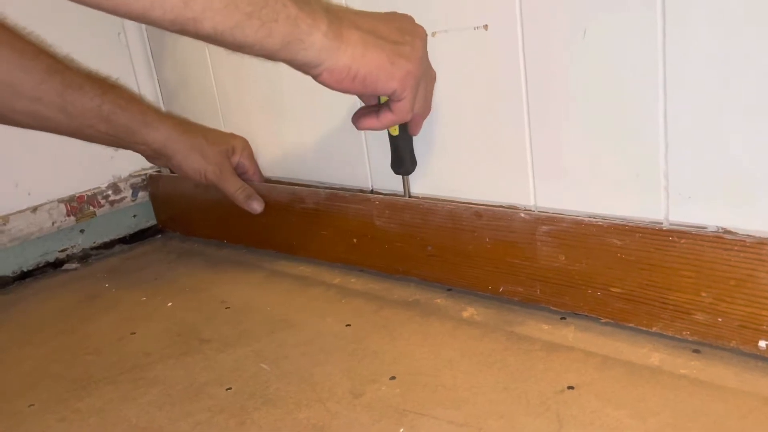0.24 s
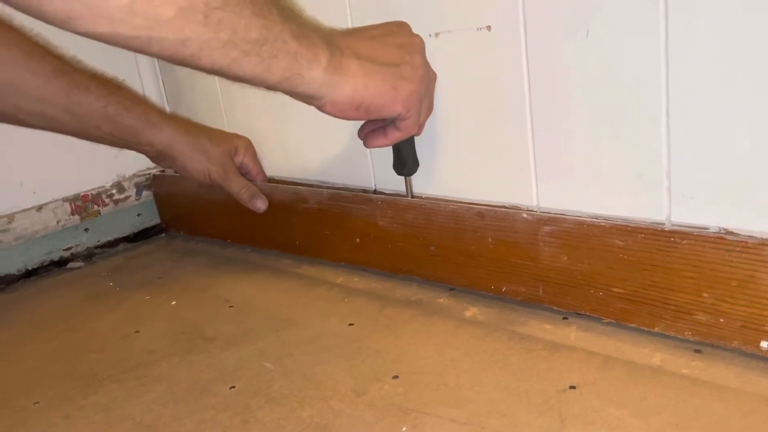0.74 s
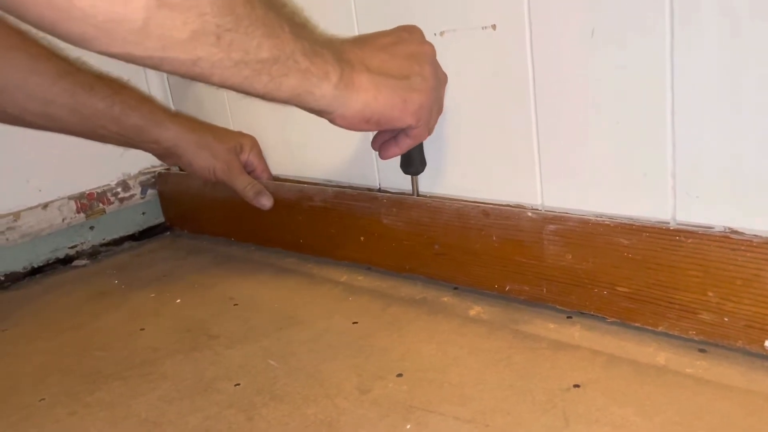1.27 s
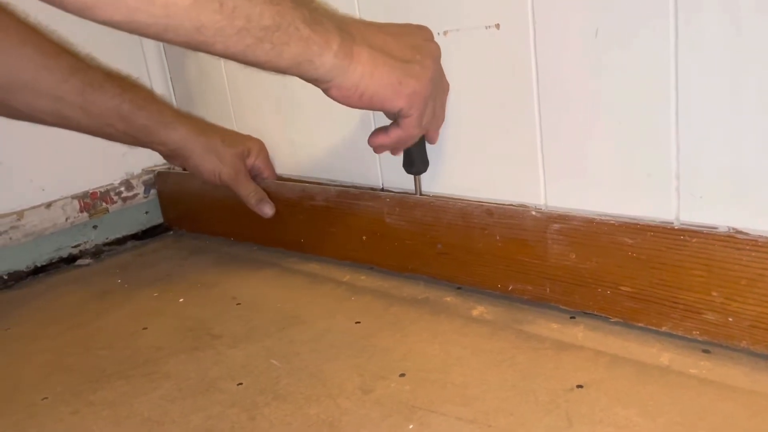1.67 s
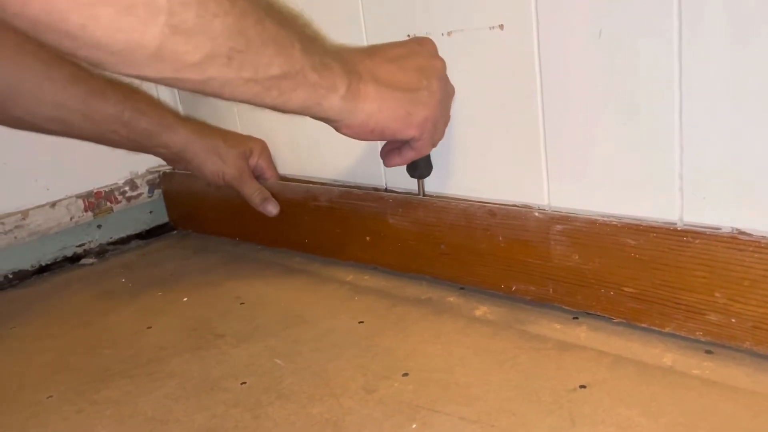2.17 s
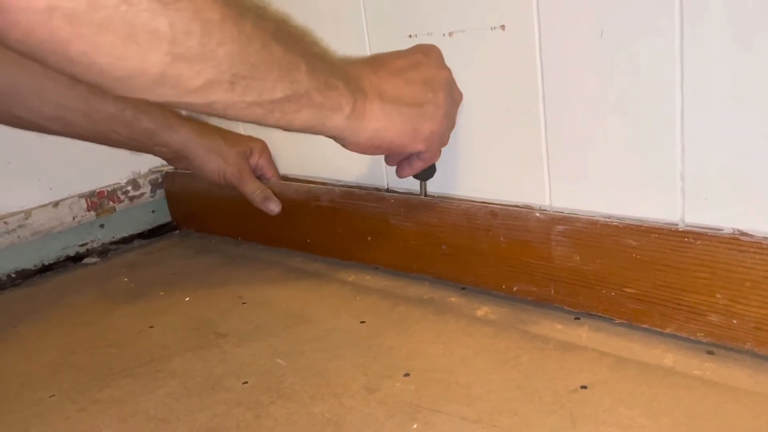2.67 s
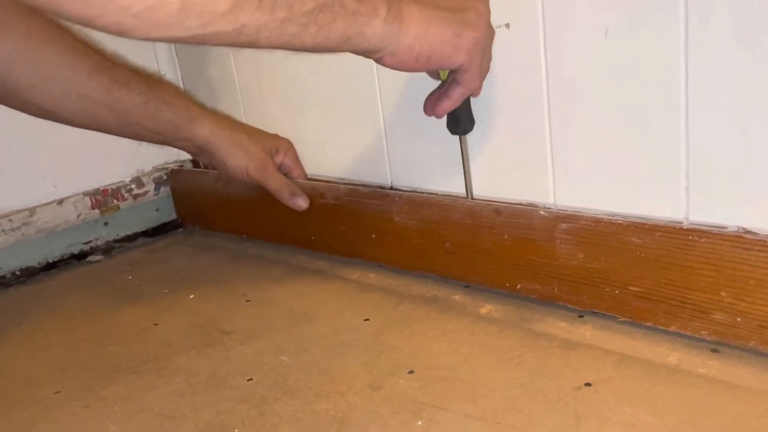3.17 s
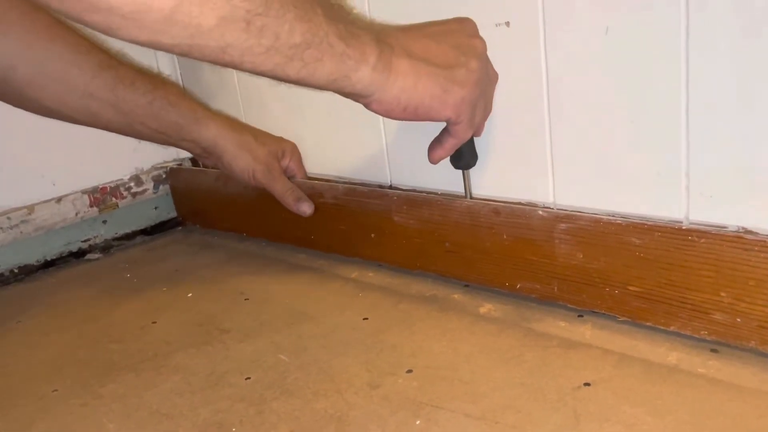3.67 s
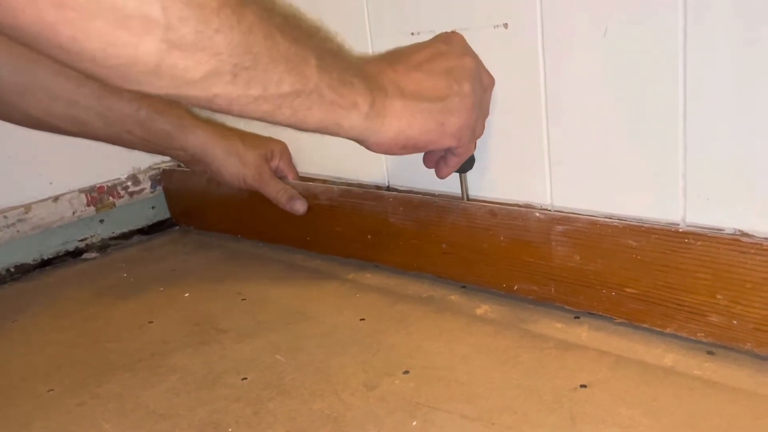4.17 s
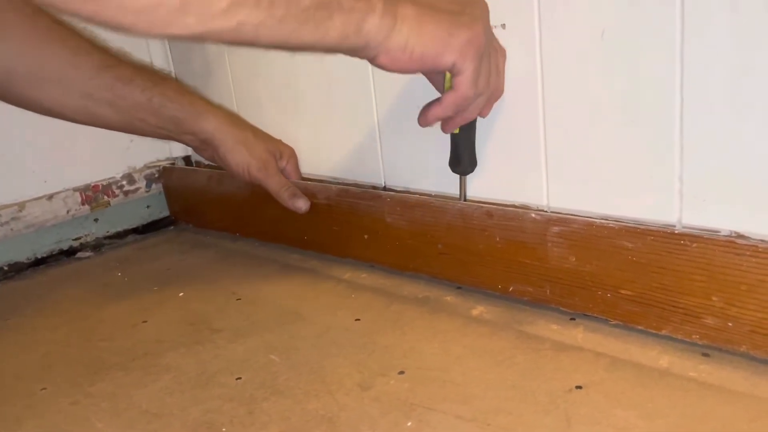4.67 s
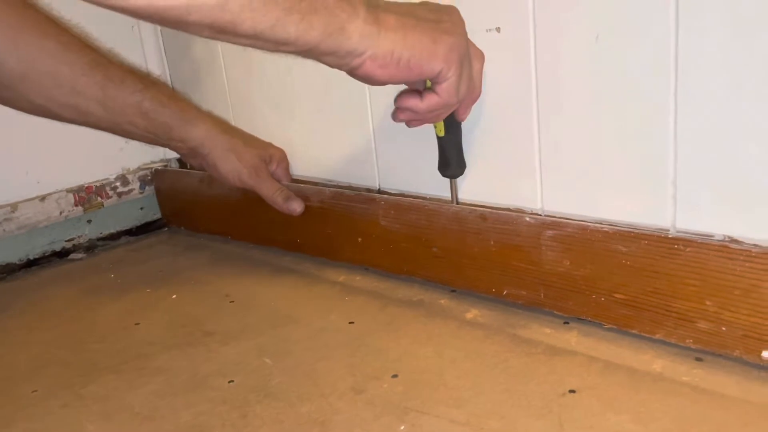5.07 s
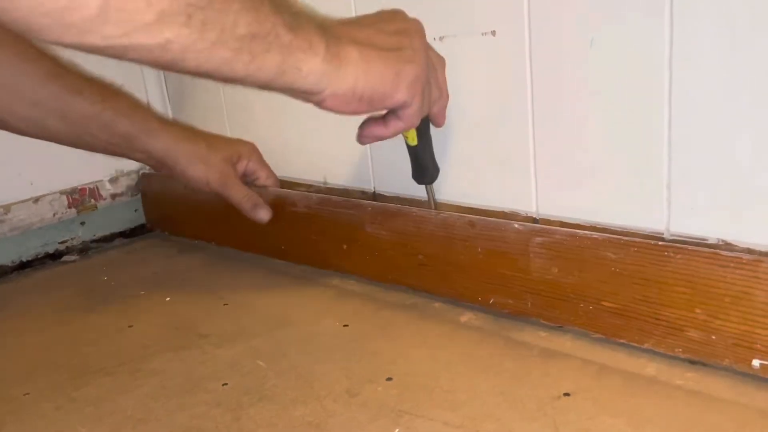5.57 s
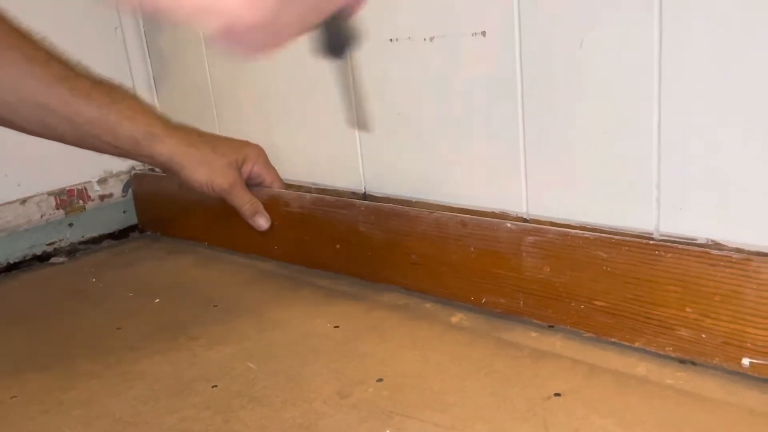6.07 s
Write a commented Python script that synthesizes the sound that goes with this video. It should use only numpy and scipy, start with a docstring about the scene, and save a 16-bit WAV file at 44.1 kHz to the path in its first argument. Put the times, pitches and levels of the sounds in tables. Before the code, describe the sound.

Small dry scrapes, clicks and soft wooden knocks as a board is pried, ending in a loud splintering crack and a brief fading rub.

```python
"""A screwdriver is worked behind a wooden baseboard in a bare room: strokes, ticks and knocks, then the
board cracks loose, rubs on the wall, and the shaft is drawn out. Noise grains and short bursts ring
modes of board, blade and shaft; damped sines and noise bend the board; a noise wash makes the slide.
Half-octave noise bands hum under it; a decaying noise tail is the room; two microphone ports hear
the work with a phase gap and balance that depend on pitch."""
import sys
import numpy as np
from scipy import signal
from scipy.fft import rfft, irfft, next_fast_len
from scipy.io import wavfile
from scipy.ndimage import uniform_filter1d

SR = 44100
rng = np.random.default_rng(int(sys.argv[2]) if len(sys.argv) > 2 else 0)


def dump_mix(stems):
    """Bounce the given channels to the path in sys.argv[1] as a 16-bit WAV at rate SR."""
    frames = np.atleast_2d(stems).T  # one column per channel
    limited = np.clip(frames, -1, 1)  # hard clip at full scale
    pcm = np.round(limited * 32767).astype(np.int16)
    wavfile.write(sys.argv[1], SR, pcm)


N = 278836
FFT = next_fast_len(N)


def undb(db):
    """dB to amplitude factor."""
    return np.exp(np.asarray(db) * np.log(10) / 20)


def level(x, db):
    """Scale x to an rms of db."""
    return x * undb(db) / np.sqrt(np.mean(x ** 2))


def ring(x, hz, width_hz):
    """Resonance with gain 1 at its centre."""
    return signal.lfilter(*signal.iirpeak(hz, hz / width_hz, SR), x)


def ring_twice(x, hz, width_hz):
    """Two equal resonances in series: steeper skirts."""
    return ring(ring(x, hz, width_hz), hz, width_hz)


def walk(rate_hz):
    """Random levels held 1 / rate_hz and slewed twice; spread near 1."""
    hold = int(SR / rate_hz)
    steps = np.repeat(rng.standard_normal(N // hold + 1), hold)
    return 1.3 * uniform_filter1d(uniform_filter1d(steps, hold), hold)[:N]


def add(out, s, sound):
    """Lay a sound into out from time s."""
    i = int(s * SR)
    out[..., i:i + sound.shape[-1]] += sound[..., :N - i]


def body(x, modes):
    """Sum of steep resonances, each a ring of the given width and one twice as wide."""
    return sum(undb(db) * ring(ring(x, f, w), f, 2 * w) for f, w, db in modes)


def grit(rate_hz, scatter_db):
    """Irregular micro-slips: random instants, a few much stronger than the rest."""
    hit = rng.random(N) < rate_hz / SR
    return hit * rng.standard_normal(N) * undb(scatter_db * rng.exponential(size=N))


NEAR_DB, NEAR_OCTAVES = 6.5, 0.2  # lift of modes close to a contact's colour
PULL = 0.7  # share of the way a near mode bends to that colour


def colour(x, modes, hz, below_db=0., above_db=0., focus=1):
    """Modes near the contact's colour ring most and bend to it; far ones may fall (dB per octave)."""
    out = 0
    for f, w, db in modes:
        away_octaves = np.log2(f / hz)
        near = np.exp(-(away_octaves / NEAR_OCTAVES) ** 2)
        share_db = db + focus * NEAR_DB * near
        share_db += below_db * min(away_octaves, 0) - above_db * max(away_octaves, 0)
        share_db += 10 * np.log10(w)  # wider modes take more power
        bent_hz = f + PULL * near * (hz - f)
        out = out + level(body(x + 1e-12, [(bent_hz, w, 0)]), share_db)
    return out


def bands(table, swell_db):
    """Half-octave noise bands that swell together and flicker alone."""
    hz, db = np.transpose(table)
    bins, out = np.fft.rfftfreq(FFT, 1 / SR)[1:], 0
    shape = undb(np.interp(np.log(bins), np.log(hz), db))
    for step in np.arange(9, 29):
        bell = np.cos(np.pi / 2 * np.clip(2 * np.log2(bins) - step, -1, 1))
        real, imag = rng.standard_normal((2, len(bins) + 1))
        noise = irfft((real + 1j * imag) * np.append(0, shape * bell), FFT)[:N]
        out = out + noise * undb(swell_db + 0.71 * walk(5.5))
    return out


# hum spectrum common to both ports: f/Hz, relative density/dB
HUM_SPECTRUM = [(15, -53), (25, -1.5), (64, 2.5), (184, 2), (304, -5), (357, -4), (429, -14), (540, -10.5),
                (664, -15), (874, -12.5), (1070, -17), (2570, -23.5), (3970, -30), (4350, -31),
                (6000, -37.5), (7800, -119), (13200, -120)]
# hum spectrum of opposite sign at the ports: f/Hz, relative density/dB
UNLIKE_SPECTRUM = [(15, -55), (25, -26), (145, -3.5), (354, -8.5), (503, -13), (714, -7.5), (796, -7.5),
                   (962, -11), (3160, -26), (5000, -36), (6920, -33.5), (9320, -51), (10700, -76),
                   (13000, -58), (16000, -73)]
# bands standing out of the hum: f/Hz, width/Hz, level/dB rms
HUM_BANDS = [(374.2, 17, -59), (726, 15.3, -60.5), (878, 63, -59)]
HUM_DB, UNLIKE_DB = -40.5, -49.5  # rms


def house():
    """Low hum of the house: shaped noise, a common part plus a part of opposite sign at the ports."""
    swell_db = 1.2 * walk(2.5)
    common = level(bands(HUM_SPECTRUM, swell_db), HUM_DB)
    for f, w, db in HUM_BANDS:
        common = common + level(ring_twice(rng.standard_normal(N), f, w), db)
    unlike = level(bands(UNLIKE_SPECTRUM, swell_db), UNLIKE_DB)
    return common + unlike * np.array([[1], [-1]])


# wooden board resonances: f/Hz, width/Hz, relative level/dB
BOARD_MODES = [(335, 77, -1), (466, 50, -6), (912, 214, 9.5), (1145, 197, 10.5), (1497, 105, 6),
               (1685, 457, 11), (2060, 254, 8), (2410, 180, 0), (2836, 89, 8.5)]
# steel blade resonances: f/Hz, width/Hz, relative level/dB
BLADE_MODES = [(3200, 240, 10), (3840, 460, -1.5), (4274, 310, 9), (4700, 430, 9.5), (5040, 380, 4),
               (5450, 140, 6), (6220, 1200, 5), (8950, 540, -4), (9250, 3050, 0), (12600, 3800, -17)]
# blade strokes on board and wall: t/s, length/s, level/dB, colour f/Hz, bright share/dB,
# bright colour f/Hz, finest hiss re level/dB, swell over the stroke/dB
STROKE_TABLE = [(0.034, 0.053, -46.5, 2300, -5.5, 4260, -25, 3),
                (0.072, 0.03, -45.5, 2290, -9, 4370, -25, -3), (0.091, 0.054, -52, 1440, -2, 4200, -18, -8),
                (0.145, 0.025, -45.5, 2080, -10.5, 4260, -34, 3),
                (0.19, 0.027, -60, 2810, -6, 4230, -37, -14),
                (0.407, 0.041, -46.5, 1500, -3.5, 4600, -14, -32),
                (0.595, 0.032, -46, 2170, -12, 5150, -18, 9), (0.646, 0.029, -48, 2200, -10, 4330, -25, -6),
                (0.7, 0.069, -53.5, 2250, -2, 4300, -16, -20), (0.89, 0.046, -51, 2300, -8, 4200, -16, -9),
                (0.975, 0.04, -47.5, 2450, -5, 4330, -14, -13),
                (1.014, 0.035, -36, 1970, -4, 4340, -17, 33), (1.024, 0.1, -46, 2100, -7.5, 4300, -15, -6),
                (1.093, 0.067, -40.5, 1670, -1.5, 4200, -20, -6),
                (1.146, 0.1, -51.5, 1720, -9.5, 4240, -46, -14), (1.535, 0.06, -61, 1000, 2, 3650, -1, 0),
                (1.584, 0.1, -41.5, 2270, -7.5, 4500, -17, 5),
                (1.702, 0.077, -42.5, 2260, -9, 4130, -30, 5), (1.768, 0.066, -53, 2500, -7, 4230, -26, 0),
                (1.891, 0.085, -42.5, 1430, -4, 4300, -16.5, -5),
                (2.019, 0.085, -38.5, 2010, -7, 4200, -23, 19),
                (2.164, 0.089, -43.5, 1970, -5.5, 4330, -17, -8),
                (2.275, 0.12, -45, 1400, -2.5, 4350, -16.5, 16),
                (2.426, 0.081, -46.5, 2100, -4.5, 4300, -25, -1),
                (2.506, 0.087, -45, 1510, -3, 4200, -22, 18), (2.636, 0.13, -50, 2250, -4, 4730, -5, -10),
                (2.71, 0.088, -45, 1240, -16, 2980, -9.5, 8),
                (2.775, 0.046, -43.5, 1090, -12, 4000, -24, -6),
                (2.826, 0.092, -39, 970, -9.5, 4400, -29, -14),
                (2.885, 0.25, -58.5, 2550, -4.5, 4200, -11, -2),
                (3.03, 0.24, -54, 1980, -0.5, 4330, -2.5, -5),
                (3.203, 0.22, -54.5, 2100, -0.5, 5400, -6.5, 0),
                (3.313, 0.28, -49.5, 1990, -6, 4400, -18.5, -11),
                (3.703, 0.018, -52, 2200, -10, 4130, -3, -8), (3.72, 0.15, -55, 1340, -13, 3200, -23, -11),
                (4.002, 0.06, -45, 1550, -6, 4200, -19, 1), (4.03, 0.066, -46, 2230, -8, 4240, -12, -7),
                (4.097, 0.15, -49.5, 1500, -6, 4250, -16, -5),
                (4.205, 0.078, -43.5, 1490, -10, 3130, -33, 31),
                (4.302, 0.14, -52.5, 1440, -5, 5760, -8.5, -3),
                (4.476, 0.43, -61.5, 1720, -3.5, 4500, -8, -23),
                (4.847, 0.098, -48, 1410, -9.5, 4230, -15, -11),
                (4.993, 0.067, -49.5, 1470, -8.5, 3450, -26, 2),
                (5.082, 0.046, -41.5, 2090, -10.5, 3070, -24, -4),
                (5.189, 0.043, -41, 1380, -8, 3010, -22, -4),
                (5.222, 0.026, -28.5, 1850, -8, 4340, -15, 22), (5.23, 0.08, -34, 2100, -12, 3230, -8, -14)]
EASE = 0.76  # share of a stroke spent pressing on and letting go
STEADY_S = 0.07  # over longer strokes the contact wanders and the bright colour blurs
REST_DB, REST_WAVER_DB, REST_ENDS_S = -77, 3., 5.24  # faint treble hiss between strokes
LINGER_S = 0.031  # the finest hiss trails after each stroke


def rubbing():
    """Dense slips ring the board, the steel blade and, finest, the paint dust between them."""
    out = np.zeros(N)
    fine = undb(REST_DB + REST_WAVER_DB * walk(4.24)) * (np.arange(N) < REST_ENDS_S * SR)
    catch = undb(2.6 * walk(70.))  # the blade catches and lets go
    wood = catch * grit(2200., 2.6)
    steel = catch * grit(3200., 2.6)
    dust = catch * grit(12000., 1.1)
    for s, length_s, db, hz, bright_db, bright_hz, fine_db, swell_db in STROKE_TABLE:
        along = np.linspace(0, 1, int(length_s * SR))
        shape = signal.windows.tukey(len(along), EASE) * undb(db + swell_db * (along - .5))
        span = slice(int(s * SR), int(s * SR) + len(along))
        woody = colour(wood[span], BOARD_MODES[2:], hz)
        focus = min(STEADY_S / length_s, 1)
        bright = colour(steel[span], BLADE_MODES[:7], bright_hz, focus=focus)
        add(out, s, shape * (level(woody, 0) + level(bright, bright_db)))
        add(fine, s, shape * undb(fine_db))
    keep = np.exp(-1 / (LINGER_S * SR))
    fine = np.maximum(fine, signal.lfilter([1 - keep], [1, -keep], fine))
    return out + fine * level(body(dust, BLADE_MODES[6:]), 0)


# ticks and cracks: t/s, board part peak/dB, colour f/Hz, treble re board/dB, treble colour f/Hz,
# decay/ms, knock re board/dB
TICK_TABLE = [(0.056, -37, 2530, -24, 4260, 2.3, -19), (0.109, -30.5, 1420, -12, 4310, 0.6, -17),
              (0.201, -34, 2700, -10, 4270, 1, -22), (0.418, -26.5, 1550, -3, 4600, 1.3, -18),
              (0.449, -37.5, 2560, 10, 4180, 2.3, -18), (0.588, -47.5, 2510, 6, 4100, 0.8, 6),
              (0.613, -36, 2190, -14, 5140, .7, -13), (0.719, -32, 2330, -23, 5070, 1.8, -25),
              (0.897, -45, 860, 2, 4300, 0.73, -15), (0.987, -37, 1820, 0.5, 4330, 2.5, -17),
              (1.036, -23, 2060, -1.5, 4300, 2.4, -9), (1.079, -36.5, 2000, 3, 5200, 1.2, -15),
              (1.129, -23.5, 1720, -13, 4200, 2.8, -11.5), (1.618, -34, 2500, -12, 4570, 2.1, -14),
              (1.651, -30.5, 2100, -4, 4200, 1.4, -6), (1.809, -23.5, 1760, -21, 4250, 0.27, -18),
              (1.845, -43, 1640, 0, 3950, 0.8, -17), (2.063, -27.5, 2070, -7, 4720, 1, -15),
              (2.36, -23, 1430, -21, 4760, 2.6, -10), (2.558, -26.5, 1610, -19, 4400, 1.2, -21),
              (2.6675, -24, 2200, -9, 4900, .8, -28), (2.683, -32, 2250, -12, 4270, 2.4, -12),
              (2.838, -23, 1980, -6, 4520, 0.4, -12), (2.8359, -16, 1170, -14, 4550, 0.54, -14),
              (2.847, -37, 2120, -5, 4700, 1.1, -11), (2.85, -36, 1150, 5, 4540, 0.89, -19),
              (2.857, -35, 2000, -1, 4600, 0.92, -15), (2.865, -43, 2010, -3, 4150, 1.1, -22),
              (2.88, -27, 940, -14, 4380, 2.3, -22), (3.701, -44, 2400, -2, 4200, .5, -15),
              (3.708, -33, 2000, -1, 4100, 0.65, -19), (4.027, -30, 2220, -11, 3030, 3.2, -18),
              (4.251, -26.5, 1520, -17, 3080, 3.4, -10), (5.094, -35, 2060, -21, 3040, 1.4, -19),
              (5.234, -23, 1870, -20, 4150, 2, -15), (5.2388, -8, 1880, -14, 4180, 1.8, -9),
              (5.2411, 0, 1900, -8.5, 5160, 1.2, -17.5), (5.243, -4, 1110, -8, 3460, 1.3, -11.5),
              (5.25, -20, 1100, 1, 3500, 1, -16), (5.253, -8.5, 1000, -9, 3750, 1.3, -27),
              (5.256, -18, 1180, -12, 3770, 1, -16), (5.263, -4, 1170, -21, 3320, 1.8, -12),
              (5.2683, -1, 1960, -7, 3260, 1.3, -20), (5.2705, -1, 1200, -20, 3210, 0.57, -21),
              (5.275, -18, 850, -18, 3640, 1, -20), (5.3063, -5.5, 3050, -5, 4600, 0.88, -8),
              (5.308, -3, 1640, 0.5, 5900, 1, -14.5), (5.31, -3.5, 1050, -23, 4730, 0.91, -25),
              (5.312, -12.5, 1810, -11, 4980, 1.8, -13), (5.321, -40, 1560, -7, 3510, 0.91, -18),
              (5.414, -20, 1750, -16, 3000, 1.9, -21), (5.424, -20.5, 2230, -14, 3240, 2, -20),
              (5.667, -25.5, 2100, -26, 3000, 1.8, -16), (5.766, -22, 2100, -2, 4640, 0.77, -17),
              (5.768, -16.5, 1080, -2, 4370, 0.66, -14)]
LEAD_S, BUILD_S = 0.01, 0.00045  # burst peak after its start; time constant of the rise
SNAP = 7  # clean first break, against the splintering around it
DETUNE, UNLIKE = 0.018, 0.16  # bend of board modes per tick; part of opposite sign at the ports
PAN_SCATTER_DB = 1.2
PRESSED = 1.08  # factor on board mode widths: shorter ring while the blade presses
BLADE_BELOW_DB, BOARD_ABOVE_DB = 16, 3.5  # fall per octave under / over a tick's colour


def ticks():
    """Each tick is a short splintering burst into board and blade modes, with a duller knock below."""
    out, t = np.zeros((2, N)), np.arange(2560) / SR
    chance = rng.standard_normal((len(TICK_TABLE), 2, len(t)))
    snap = SNAP * (np.arange(len(t)) == int(LEAD_S * SR))
    for row, (alike, unlike) in zip(TICK_TABLE, chance):
        s, db, hz, treble_db, treble_hz, decay_ms, knock_db = row
        envelope = np.exp(np.minimum((t - LEAD_S) / BUILD_S, (LEAD_S - t) / (decay_ms / 1000)))
        burst = (alike + snap + UNLIKE * np.array([unlike, -unlike])) * envelope
        board = [(f * (1 + DETUNE * bend), PRESSED * w, g)
                 for (f, w, g), bend in zip(BOARD_MODES, unlike)]
        woody = colour(burst, board[2:-1], hz, above_db=BOARD_ABOVE_DB)
        treble = colour(burst, BLADE_MODES, treble_hz, below_db=BLADE_BELOW_DB)
        knock = colour(burst, board[:2], hz)
        parts = ((woody, 0), (treble, treble_db), (knock, knock_db))
        sound = sum(undb(share_db) * part / np.abs(part).max() for part, share_db in parts)
        side_db = PAN_SCATTER_DB * np.tanh(alike[0]) / 2
        add(out, s - LEAD_S, undb(db + np.array([[side_db], [-side_db]])) * sound)
    return out


# board flexing against the wall: t/s, swing peak/dB, f/Hz, groan re swing peak/dB, T60/s
THUMP_TABLE = [(0.947, -28, 67, -32, 0.087), (1.044, -26.5, 111, -19, 0.069), (1.074, -33, 100, -24, 0.09),
               (1.557, -30, 104, -25, 0.14), (2.062, -28, 117, -8.5, 0.17), (2.085, -32.5, 276, -10, .1),
               (2.1, -26.5, 73, -32, 0.14), (2.152, -31, 60, 1, 0.064), (2.362, -29.5, 187, -1.5, 0.15),
               (2.388, -22, 62.4, -13, 0.1), (2.467, -36, 100, -18, 0.061), (2.569, -33, 206, -17, 0.19),
               (2.599, -35, 51, -8, 0.097), (2.695, -38, 202, 3.5, 0.19), (2.729, -35, 218, -6, 0.14),
               (2.861, -45, 137, 6, 0.26), (2.891, -37, 167, -24, 0.27), (4.37, -32, 116, -19, 0.16),
               (4.544, -35, 68.6, -14, 0.11), (5.073, -28, 104, -36, 0.11), (5.11, -25.5, 69.4, -23, 0.073),
               (5.242, -12, 200, 0, 0.091), (5.251, -9.5, 99, -28, 0.14), (5.272, -24, 162, 2, 0.069),
               (5.296, -22.5, 99, -18, 0.072), (5.31, -17, 99, -5, 0.088)]
RATTLE_DB = -6.5  # rms re swing peak


def thumps():
    """Low bending of the long board: a damped swing, a rattle of neighbour modes, a groan of the wood."""
    out, t = np.zeros(N), np.arange(10240) / SR
    chance = rng.standard_normal((len(THUMP_TABLE), len(t)))
    for (s, db, hz, groan_db, t60_s), noise in zip(THUMP_TABLE, chance):
        fade = (1 - np.exp(-t / 0.00034)) * np.exp(-np.log(1000) * t / t60_s)
        swing = np.sin(2 * np.pi * hz * t)
        rattle = level(ring_twice(noise, 2.42 * hz, 2.2 * hz), RATTLE_DB)
        groan = level(body(noise, BOARD_MODES[:2]), groan_db)
        add(out, s, undb(db) * fade * (swing + rattle + groan))
    return out


def shares(table):
    """Gains of the woody, bright and finest parts along a curve; silent before it."""
    s, db, *shares_db = np.transpose(table)
    t = np.arange(N) / SR
    return np.array([undb(np.interp(t, s, db + share)) * (t >= s[0]) for share in (0, *shares_db)])


def wash(modes):
    """Countless slips through each mode, every mode flickering by itself."""
    return sum(body(grit(9000., 1.5), [mode]) * undb(1.2 * walk(8.6)) for mode in modes)


# freed board sliding, then settling; before the part trims:
# t/s, level/dB, bright share/dB, finest hiss re level/dB
SLIDE_CURVE = [(5.316, -32, -5, -20), (5.326, -33.5, -5, -13), (5.42, -36.5, -5, -18),
               (5.445, -38.5, -6.5, -17.5), (5.576, -37.5, -10, -35), (5.646, -43.5, -10, -22),
               (5.67, -38.5, -9, -22), (5.74, -55.5, -10, -29), (5.79, -43, -17, -23), (5.858, -59, -1, -5),
               (5.93, -52, -8, -15), (5.982, -72, -22, -4), (6.068, -59, -1, -10.5), (6.2, -64, 2, -7),
               (6.28, -72, -6, 1), (6.32, -53.5, 6.5, -7)]
# colours of the slide: f/Hz, width/Hz, relative level/dB
WALL_MODES = [(823, 200, 2), (1310, 600, 1), (1880, 1080, -0.5), (3060, 1600, 4), (4600, 660, 0),
              (5910, 860, 0.5)]


def sliding():
    """The board rubs along the wall: a wash in three parts whose colours flicker apart."""
    trims = ((WALL_MODES[:3], -1.5), (WALL_MODES[3:], .3), (BLADE_MODES[6:], 3.))  # dB rms
    parts = [level(wash(modes), db) for modes, db in trims]
    return np.sum(shares(SLIDE_CURVE) * parts, axis=0) * undb(.8 * walk(40.))


# free ring of the screwdriver: f/Hz, width/Hz, relative level/dB
SHAFT_MODES = [(1280, 170, 0), (1620, 200, -7), (2520, 300, -12), (3210, 190, -6), (5310, 450, -20)]
# shaft drawn out of the gap: t/s, level/dB
DRAW_OUT_CURVE = [(5.79, -75), (5.84, -62), (5.875, -53), (5.905, -46), (5.93, -52), (5.96, -57),
                  (6.05, -56), (6.12, -59), (6.25, -67)]


def drawing_out():
    """The shaft brushes the wood as it leaves the gap: slips ring its free modes faintly."""
    s, db = np.transpose(DRAW_OUT_CURVE)
    curve_db = np.interp(np.arange(N) / SR, s, db, left=-200, right=-200)
    gain = undb(curve_db + 2 * walk(30.))
    return gain * level(body(grit(2500., 1.2), SHAFT_MODES), 0)


# port differences: f/Hz, left lead/rad, left minus right/dB
PORT_TABLE = [(0, -0.2, 0), (252, .5, -1.7), (700, 0.88, -2.2), (1310, 1.07, -1.5), (2100, 1.34, 0.5),
              (2900, 1.16, 1), (3800, 0.81, 3.5), (4630, 1, 2.5), (7240, -3.5, 1), (10460, -5, -0.5),
              (16500, -13, 1)]


def ports(x):
    """The two ports hear a near source with a phase gap and a balance that change with pitch."""
    hz, lead_rad, left_db = np.transpose(PORT_TABLE)
    bins = np.fft.rfftfreq(FFT, 1 / SR)
    phase = np.exp(1j * np.interp(bins, hz, lead_rad) / 2)
    left = phase * undb(np.interp(bins, hz, left_db) / 2)
    return irfft(rfft(x, FFT) * np.array([left, 1 / left]), FFT)[:, :N]


ROOM_DB, ROOM_T60_S, ROOM_TOP_HZ = -17, 0.21, 4840


def room(x):
    """Bare walls answer with a short, dull, unlike tail in each channel."""
    t = np.arange(SR // 2) / SR
    fade = (1 - np.exp(-t / 0.0045)) * np.exp(-np.log(1000) * t / ROOM_T60_S)
    tail = rng.standard_normal((2, len(t))) * fade
    tail = signal.lfilter(*signal.butter(1, ROOM_TOP_HZ, fs=SR), tail)
    tail = undb(ROOM_DB) * tail / np.sqrt(np.sum(tail ** 2) / 2)
    return signal.fftconvolve(x[None], tail, axes=1)[:, :N]


def scene():
    """Screwdriver work at the ports, its room tail and the hum."""
    work = rubbing() + ticks() + thumps() + sliding() + drawing_out()
    return house() + ports(work) + room(work.mean(axis=0))


LOW_HZ, TOP_HZ = 38., 16600


def record(dry):
    """Round the loudest peaks, drop the deepest bass and cut the top."""
    soft = np.tanh(1.1 * dry) / 1.1
    soft = signal.sosfilt(signal.butter(6, LOW_HZ, "high", fs=SR, output="sos"), soft)
    return signal.sosfilt(signal.ellip(8, .2, 70, TOP_HZ, fs=SR, output="sos"), soft)


dry = scene()
out = record(dry)
dump_mix(out)
```